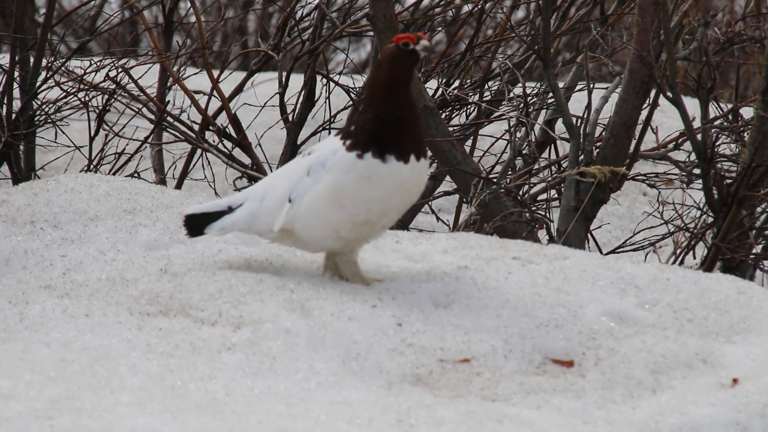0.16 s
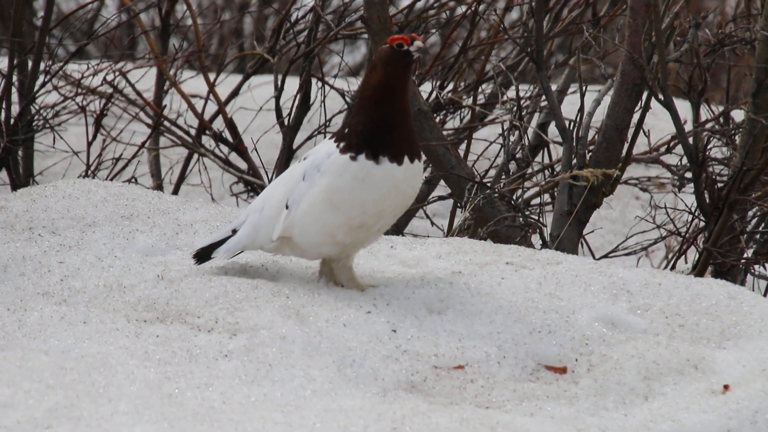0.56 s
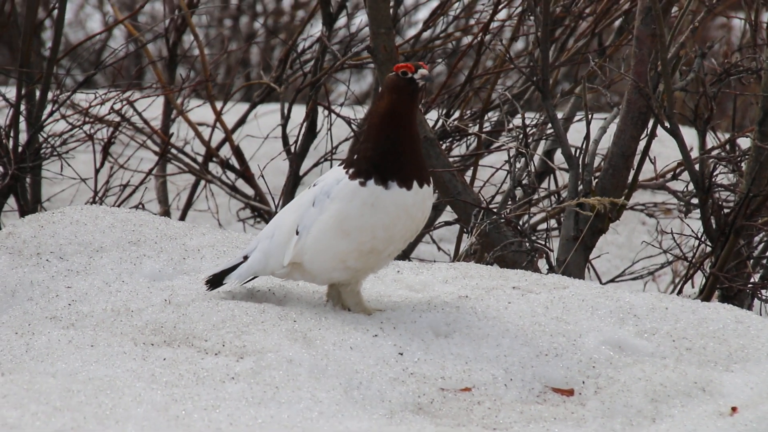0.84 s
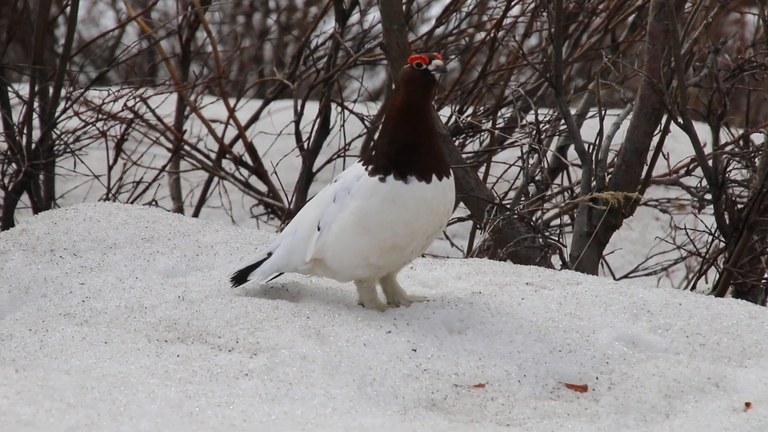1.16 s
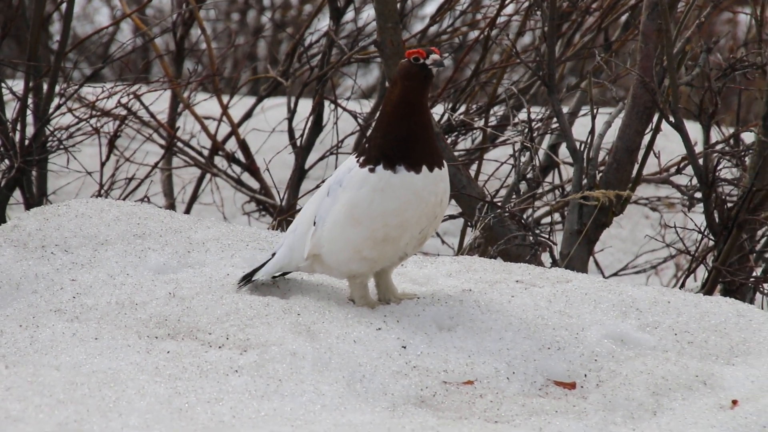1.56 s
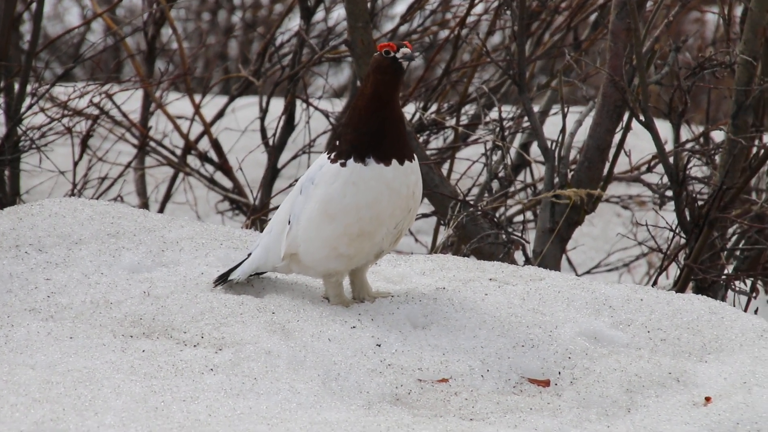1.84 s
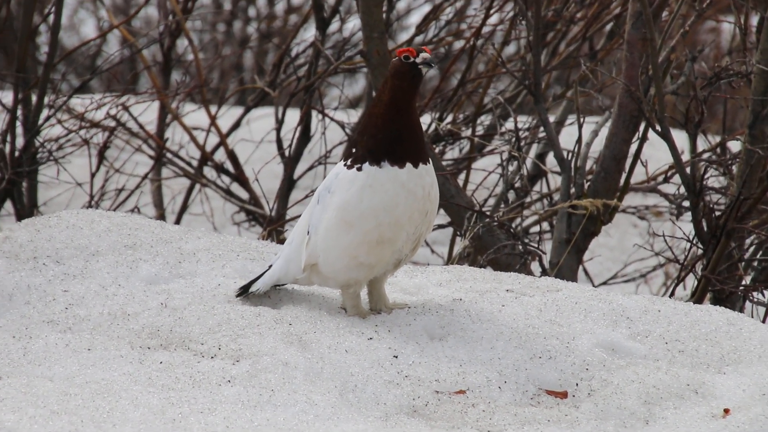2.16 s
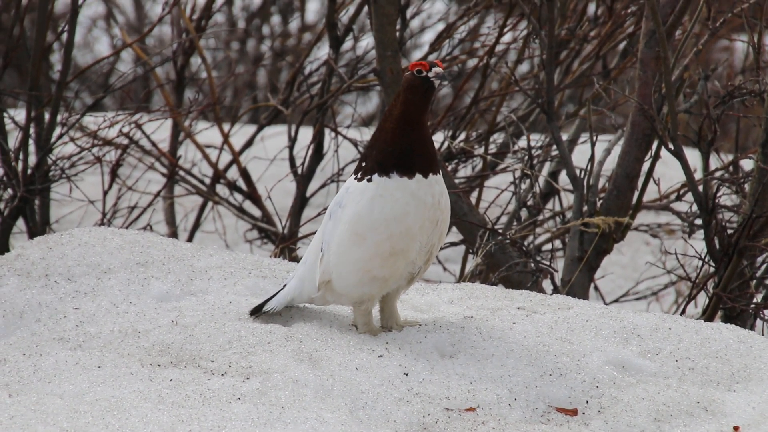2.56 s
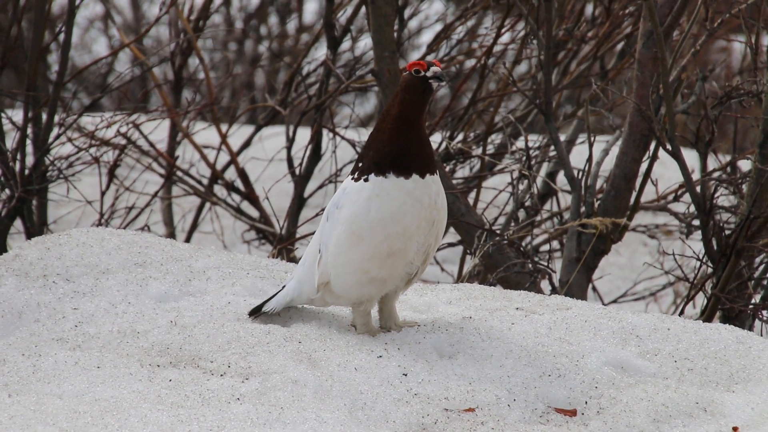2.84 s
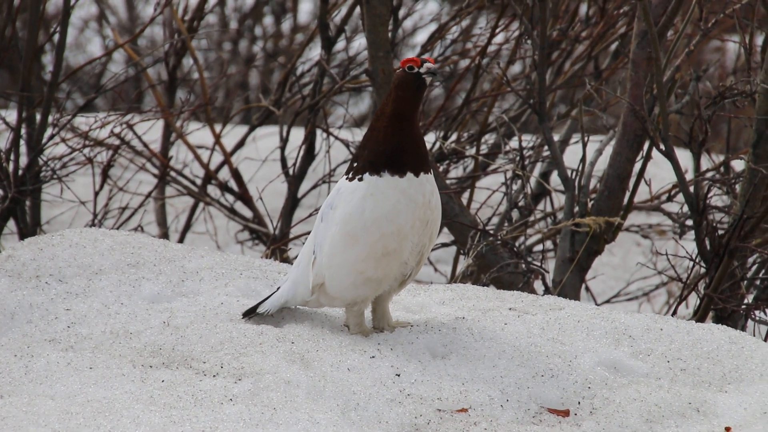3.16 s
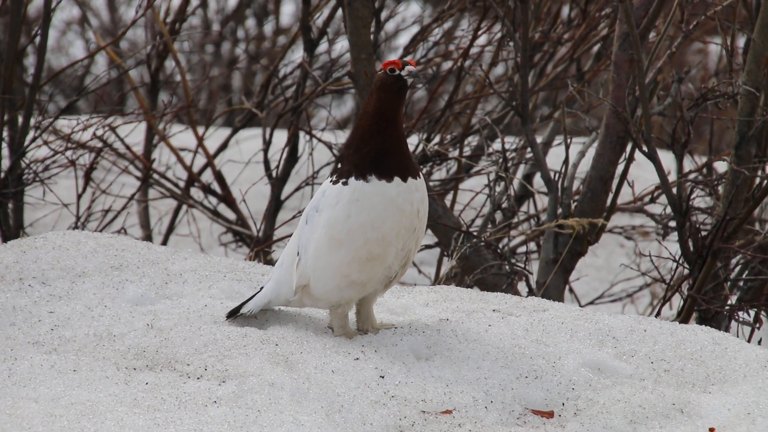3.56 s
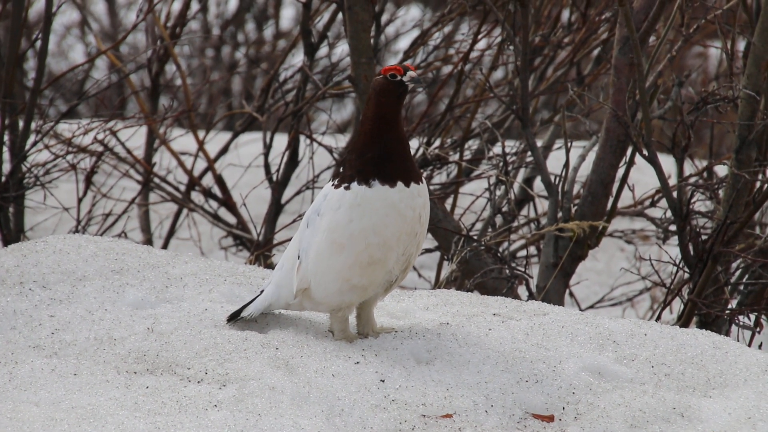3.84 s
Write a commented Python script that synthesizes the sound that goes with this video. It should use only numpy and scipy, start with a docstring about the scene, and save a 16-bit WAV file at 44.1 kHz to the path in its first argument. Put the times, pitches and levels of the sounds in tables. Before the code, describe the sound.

A ptarmigan gives short, pulsed throaty croaks, faint from 0.8 s, stronger by 1.3 s, quickening into a brighter open rattle around 2.5-3 s and ending softly at 3.3 s. Low wind buffets the stereo microphone, mostly in the first 2 s. Six dry camera-like double clicks at 0.26-0.65 s start with clatter and motor whirr; four more follow at 1.46-1.77 s. A faint thin chirp at 0.9 s; faint air hiss.

```python
"""Wind rumbles on two microphone ports throughout, over faint air hiss; most buffets fall in the first 2 s.
From 0.26 s: six dry double clicks, probably a camera lens; the first breaks into a clatter and a motor whirr.
From 0.77 s: a ptarmigan croaks, speeding up into a rattle as throat and bill open; it ends softly at 3.3 s.
Each croak is a few pulses ringing sweeping throat resonances; bushes scatter the bird sounds.
At 0.87 s: a small bird's thin chirp. At 1.46-1.77 s: four more double clicks between and beside early croaks."""
import sys
import numpy as np
from scipy import signal
from scipy.fft import rfft, irfft
from scipy.io import wavfile
from scipy.ndimage import uniform_filter1d

SR = 44100
rng = np.random.default_rng(int(sys.argv[2]) if len(sys.argv) > 2 else 0)


def dump(signal):
    """Clip the signal to [-1, 1] and save it as 16-bit WAV at the path in sys.argv[1]."""
    limited = np.clip(np.atleast_2d(signal).T, -1, 1)
    pcm = np.round(limited * 32767).astype(np.int16)
    wavfile.write(sys.argv[1], SR, pcm)


N = 176400

# croaks: start_s, level_db (before VOICE_DB), pulse_rate_hz, length_s, bill_opening (0-1), treble_db
CROAKS = [(0.7707, -46, 134.2, 0.032, 0, -15), (1.053, -39, 144.4, 0.025, 0, -14),
          (1.3039, -34, 144.6, .03, 0, -4), (1.531, -33.5, 145, 0.029, 0.03, 1.5),
          (1.696, -34, 146.3, 0.029, 0.05, 2.5), (1.832, -33, 146.6, .027, 0.15, -0.5),
          (1.9484, -32, 158.3, 0.029, 0.32, 0.5), (2.0586, -32, 161.6, 0.032, 0.35, 0),
          (2.1628, -32, 166.4, 0.034, .41, -1.5), (2.262, -31.5, 166.7, 0.035, 0.46, -1),
          (2.3581, -30.5, 174, 0.035, 0.47, 1.5), (2.449, -32, 169.2, 0.034, 0.6, -0.5),
          (2.5351, -31, 182, 0.031, 0.6, 0.5), (2.615, -31, 183.9, 0.032, 0.64, -1.5),
          (2.6918, -30, 189, 0.028, 0.72, 1), (2.7611, -29.5, 190.6, 0.026, 0.82, -1),
          (2.8224, -29.5, 188.1, 0.022, 0.89, -0.5), (2.8765, -29.5, 180, 0.024, 0.96, -1.5),
          (2.9285, -32.5, 171.2, 0.0217, .94, -1), (2.9782, -30.3, 180, .021, 0.99, -2.5),
          (3.0264, -36.5, 151.7, 0.013, 1, -14), (3.0692, -33, 167.5, 0.019, 0.95, -1),
          (3.117, -32, 165.6, .0165, 0.96, -2), (3.1655, -35.5, 152.6, .015, .92, -7),
          (3.2145, -34, 166, 0.016, 0.94, -6), (3.267, -34.5, 150.1, .019, 0.85, -6),
          (3.3306, -53.5, 122.3, 0.0092, 0, -2)]
# throat resonances, bill shut to wide: 4 x centre_hz, 4 x level_db, width_hz
THROAT = [(858.6, 845, 835, 795, 4.5, 4, 1, -2, 72), (1276, 1640, 1900, 2130, -2.5, -3, -2, 0.5, 93),
          (2740, 2660, 2490, 2430, -24, -7.5, 0.5, 0, 85),
          (3290, 4200, 5000, 5500, -15, -24.5, -21.5, -14.5, 86),
          (4070, 4500, 4350, 4190, -22, -10, -16.5, -14.5, 116),
          (5800, 6700, 7800, 9800, -52, -17, -12.5, -34, 210)]
# sign of each throat resonance
POLARITY = [1, -1, 1, 1, 1, -1]
# pulse strength through a croak: share_of_length, level_db
EFFORT = [(0, -4), (.22, -1), (.4, 0), (.6, -4.5), (.8, -8.5), (1, -17.5)]
# bill swing about its mean opening: share_of_length, swing (scaled down towards shut or wide)
BILL_SWING = [(0, -0.669), (.25, -0.147), (.48, 0.168), (.72, .44), (1.2, 0.24)]
# snap strength through a croak: share_of_length, level_db (before SNAP_DB)
SNAP_EFFORT = [(0, -13), (.19, 6), (.38, -5.5), (.56, -8), (1, -34)]
# snap colour: freq_hz, level_db
SNAP_COLOUR = [(3500, -30), (6300, -22), (8200, 2.5), (10500, 0.5), (12500, -9), (16000, -13)]
# lens clicks: start_s, level_db (before CLICK_DB), second_contact_delay_s, second_contact_db (relative)
CLICKS = [(0.2629, -24, 0.0091, -4), (0.3256, -23.5, 0.006, -6), (0.4063, -25.5, 0.0073, 1),
          (0.486, -24, .0042, -8), (.5670, -27, .0032, -2.5), (0.6449, -27.5, 0.0042, -1),
          (1.4613, -25.5, .0046, -1), (1.6058, -27, .0046, -1.5), (1.6874, -24.5, .0046, -12),
          (1.7656, -25.5, .0042, -5)]
# resonances of a click: freq_hz, level_db, t60_s
CLICK_MODES = [(753, -9.5, 0.047), (1100, -12, .03), (1360, -16, 0.043), (1674, -9, 0.014),
               (1783, -7, 0.023), (2506, 1.5, 0.0082), (2557, -7.5, 0.019), (2920, -13, 0.017),
               (3254, -5.5, 0.014), (3570, -10.5, 0.017), (4220, -25.5, 0.03), (4450, -19, 0.02),
               (5100, -35, 0.0087)]
# noisy body of a click: freq_hz, level_db
CLICK_BODY_COLOUR = [(200, -32), (700, -1), (1700, -3), (3600, 2), (5000, -13.5), (6500, -29), (15000, -38)]
# clatter contacts: start_s, ring_db, crack_db, splash_db
CLACKS = [(0.2638, -39, -28.5, -41), (0.2675, -48, -41, -41), (.2724, -32, -33, -43),
          (0.2765, -23, -40, -37.5), (0.2817, -28, -32, -58)]
# resonances of the clatter: freq_hz, level_db, t60_s
CLACK_MODES = [(716, -16, 0.027), (883, -7, 0.038), (980, -3, 0.034), (1170, 1.5, 0.042), (1540, -11, .027),
               (1700, -2, 0.019)]
# crack colour: freq_hz, level_db
CRACK_COLOUR = [(900, -9), (2000, -11), (3000, 2.5), (3600, 2), (4300, -17), (5500, -25), (9000, -45)]
# splash colour: freq_hz, level_db
SPLASH_COLOUR = [(3000, -18), (5000, 6), (6000, -14), (7000, 0), (8200, -10), (9400, 2), (11200, -13),
                 (13000, -6), (16000, -11)]
# lens motor whirr: time_s, level_db
WHIRR_LEVEL = [(.27, -66), (.285, -29), (.31, -41.5), (.38, -47), (.5, -52), (.68, -55), (.75, -87)]
# whirr colour: freq_hz, level_db
WHIRR_COLOUR = [(300, -31), (750, -2.5), (1150, -3), (1500, -19), (3000, -28), (8000, -43)]
# small bird whistle: time_s, pitch_hz, level_db
CHIRP = [(.872, 8200, -83), (.884, 7870, -56), (.897, 6870, -50.5), (0.911, 6530, -57), (.923, 6200, -58),
         (.942, 6350, -71)]
# wind between buffets: time_s, left_db, right_db (before WIND_DB)
WIND_LEVEL = [(0, -25, -41.5), (.12, -52, -52), (.3, -34, -38.5), (.45, -24.5, -22.5), (.65, -33, -21.5),
              (.9, -25, -34), (1.05, -37.5, -37.5), (1.35, -34.5, -36.5), (1.5, -29, -25),
              (1.783, -36.5, -42), (1.95, -33.5, -42), (2.2, -46.5, -52), (2.4, -46, -60), (2.6, -75, -69),
              (2.9, -54, -67), (3.15, -43.5, -58), (3.5, -51.5, -58), (4, -57, -62)]
# buffets on the left port: centre_s, level_db (before BUFFET_DB), length_s
BUFFETS_LEFT = [(0.233, -23.5, 0.018), (0.414, -8, 0.022), (0.565, -14.5, 0.034), (0.612, -9.5, 0.026),
                (0.788, -16.5, 0.025), (0.896, -12.5, 0.016), (1.009, -21, 0.013), (1.164, -9.5, 0.022),
                (1.193, -19, 0.015), (1.241, -16.5, 0.022), (1.344, -24.5, 0.015), (1.402, -15, 0.019),
                (1.428, -23, 0.022), (1.65, -20, 0.03), (1.833, -25, 0.015), (1.894, -20.5, 0.023),
                (1.938, -18.5, 0.066), (2.132, -33, 0.1), (2.315, -34, 0.015), (2.997, -37.5, 0.0107),
                (3.045, -34, 0.025), (3.282, -27.5, 0.052), (3.588, -37, 0.014), (3.644, -34, 0.0099),
                (3.713, -32.5, 0.031)]
# buffets on the right port: centre_s, level_db (before BUFFET_DB), length_s
BUFFETS_RIGHT = [(0.284, -26.5, 0.036), (0.451, -16, 0.0077), (0.547, -23.5, 0.16), (0.594, -18, 0.026),
                 (0.645, -11.5, 0.013), (0.706, -17.5, 0.016), (0.831, -24, 0.038), (0.952, -28, 0.061),
                 (1.102, -19.5, 0.009), (1.248, -21.5, 0.038), (1.353, -23, 0.024), (1.426, -21, 0.055),
                 (1.514, -22, 0.02), (1.667, -27.5, 0.02), (1.753, -26.5, 0.022), (2.004, -29.5, 0.032),
                 (2.161, -36, 0.14), (2.219, -32.5, 0.025), (2.327, -36, 0.049), (3.568, -38, 0.026)]
# colour of light wind: freq_hz, level_db
RUMBLE_COLOUR = [(15, -52), (35, -9.5), (80, 3), (130, -0.5), (200, -11.5), (300, -30), (500, -40),
                 (1500, -93)]
# colour of the extra eddies in hard gusts: freq_hz, level_db
EDDY_COLOUR = [(30, -43), (70, -17), (150, 1), (240, 7.5), (400, -11.5), (600, -28), (1000, -35),
               (2000, -60), (5000, -99)]
# sharp swirls across the left port: centre_s, level_db, length_s
SWIRLS = [(0.402, -22, 0.0065), (.481, -21, .008), (0.554, -18.5, 0.023), (0.566, -11, 0.0065),
          (0.581, -13.5, 0.0038), (0.612, -14.5, 0.012), (.893, -19.5, 0.0062), (1.121, -24, 0.016),
          (1.149, -21.5, 0.02), (1.932, -27.5, 0.026)]
# swirl colour: freq_hz, level_db
SWIRL_COLOUR = [(100, -31), (230, 8), (320, 11.5), (420, 2), (520, 1), (750, -11), (1100, -19.5),
                (2200, -63), (5000, -80)]
# outdoor air hiss: freq_hz, level_db
AIR_COLOUR = [(120, -50), (200, -22), (249, 0), (339, -1.5), (430, -3.5), (515, -3.5), (812, -2.5),
              (1300, -11), (3180, -15.5), (8660, -20.5), (15500, -26)]

VOICE_DB, VOICE_PAN_DB, PORT_LAG_S = 1.5, -.5, 2.6e-5  # pan: left minus right; lag: left port later
PITCH_ARCH, ARCH_PEAK_SHARE = .045, .55  # pulse period is shortest at the peak share
PULSE_JITTER, PULSE_SCATTER_DB = .012, 1.95
LEAD_IN_DB, LEAD_TREBLE_DB, ONSET_TREBLE_DB = -17, -18.5, -1  # faint lead-in pulse; first full pulse
SOFT_TREBLE_DB_PER_DB, LOW_FADE_DB = 0.3, -3.5  # weak pulses are dull; the lowest resonance fades
LOW_SAG_HZ, LOW_SAG_FROM_SHARE = 96, 0.51  # the lowest resonance sinks late in a croak
BREATH_DB, BREATH_S = -18, 0.0045
CHEST_HZ, CHEST_WIDTH_HZ, CHEST_DB, CHEST_DB_PER_EFFORT_DB = 367, 51, -26, 0.31
SNAP_DB, SNAP_S = -21, 0.0022
HOLLOW_HZ, HOLLOW_Q = 558, 3.7  # dip between chest and throat
CLICK_DB, CLICK_TICK_DB, CLICK_SCRAPE_S = 2, -33, 0.0014
CLICK_PORT_SPREAD_CYCLES = 0.165  # the camera body gives each port its own phases
FIRST_TILT_DB_PER_OCT, SECOND_TILT_DB_PER_OCT, TILT_HZ = 0, -0.5, 2600
CRACK_S = 0.00064
BODY_DB, BODY_T60_S, BODY_ATTACK_S = -9.5, 0.059, .0015
WHIRR_HZ = 126
CHIRP_OCTAVE_DB = -10
WIND_DB, BUFFET_DB, EDDY_DB = 3, 1.5, -4
RUMBLE_GROWTH, EDDY_GROWTH = 0.99, 2.52  # exponents on gust strength
GUST_REF_DB, GUST_CEILING_DB, STEADY_S = -16.5, -14, 0.015
AIR_DB, AIR_SHARED = -55.5, 0.23  # share of power common to both ports
TWIG_DB, TWIG_T60_S = -14, 0.053
THICKET_DB, THICKET_T60_S, THICKET_DELAY_S, THICKET_HZ = -19, 0.54, 0.0018, 1600
LOW_CUT_HZ, TOP_HZ = 24, 15850


def undb(db):
    """Decibels to gain."""
    return 10 ** (np.asarray(db) / 20)


def unit(x):
    """Scale to rms 1."""
    return x / np.sqrt(np.mean(x ** 2) + 1e-20)


def add(out, start_s, x):
    """Mix x into out at start_s."""
    i = max(int(round(start_s * SR)), 0)
    out[..., i:i + x.shape[-1]] += x[..., :N - i]


def noise(colour, size=N):
    """Noise of rms 1, its spectrum interpolated over log frequency."""
    hz, db = np.array(colour, float).T
    f = np.maximum(np.arange(size // 2 + 1) * SR / size, 1)
    gain = undb(np.interp(np.log(f), np.log(hz), db))
    return unit(irfft(rfft(rng.standard_normal(size)) * gain, size))


def croak(rate_hz, length_s, opening, treble_db, size=3000):
    """Pulses ring throat resonances that sweep with the bill, plus breath, chest ring and snap."""
    t = np.arange(size) / SR
    throat, openings = np.array(THROAT, float), np.linspace(0, 1, 4)
    progress = (t - 1 / rate_hz) / length_s  # 0 at the first full pulse
    swing = np.sqrt(np.clip(opening * (1 - opening), 0, 1))
    bill = np.clip(opening + swing * np.interp(progress, *np.array(BILL_SWING).T), 0, 1)
    hz = np.array([np.interp(bill, openings, row[:4]) for row in throat])
    hz[0] -= LOW_SAG_HZ * np.clip(2 * (progress - LOW_SAG_FROM_SHARE), 0, 1)
    turn = 2 * np.pi * np.cumsum(hz, axis=1) / SR
    high = np.clip(np.log2(hz[:, 0] / 2000), 0, 1)  # how far treble settings apply

    # breath: narrow noise riding on each resonance
    flutter = uniform_filter1d(rng.standard_normal((2,) + hz.shape), size=40)
    flutter = unit(uniform_filter1d(flutter, size=40))
    breath = undb(BREATH_DB) * (flutter[0] * np.sin(turn) + flutter[1] * np.cos(turn))
    snap = undb(SNAP_DB + treble_db) * np.sqrt(bill) * noise(SNAP_COLOUR, size=size)

    chance = rng.standard_normal((10, 2))
    out, at_s = np.zeros(size), 0
    for k in range(min(int(length_s * rate_hz) + 2, 10)):  # pulse 0 is the lead-in
        i = min(int(at_s * SR), size - 1)
        share = max(k - 1, 0) / rate_hz / length_s
        stretch = 0
        if k:
            arch = abs(share / ARCH_PEAK_SHARE - 1) * 2 - 1
            stretch = PITCH_ARCH * arch + PULSE_JITTER * chance[k, 0]
        at_s += (1 + stretch) / rate_hz
        effort_db = np.interp(share, *np.array(EFFORT).T) if k else LEAD_IN_DB

        db = np.array([np.interp(bill[i], openings, row[4:8]) for row in throat])
        db += high * (treble_db + SOFT_TREBLE_DB_PER_DB * effort_db)
        db[2:] += LEAD_TREBLE_DB * (k == 0) + ONSET_TREBLE_DB * (k == 1)
        db[0] += LOW_FADE_DB * share

        age = t[:size - i]
        phase = turn[:, i:] - turn[:, i:i + 1]
        rings = np.exp(-np.pi * throat[:, 8:] * age) * np.sin(phase)
        rings = rings + breath[:, i:] * np.exp(-age / BREATH_S)
        pulse_gain = undb(effort_db + PULSE_SCATTER_DB * chance[k, 1])
        out[i:] += pulse_gain * ((POLARITY * undb(db)) @ rings)
        if k:
            chest = np.exp(-np.pi * CHEST_WIDTH_HZ * age) * np.sin(2 * np.pi * CHEST_HZ * age)
            out[i:] += undb(CHEST_DB + CHEST_DB_PER_EFFORT_DB * effort_db) * chest
            snap_gain = undb(np.interp(share, *np.array(SNAP_EFFORT).T))
            out[i:] += snap_gain * snap[i:] * np.exp(-age / SNAP_S)
    return out / np.sqrt(np.sum(out ** 2) / (.026 * SR))  # equal energy for every croak


def ptarmigan():
    """The run of croaks; each begins one pulse early with a faint lead-in."""
    out = np.zeros(N)
    for start_s, db, rate_hz, length_s, opening, treble_db in CROAKS:
        call = croak(rate_hz, length_s, opening, treble_db)
        add(out, start_s - 1 / rate_hz, undb(db + VOICE_DB) * call)
    return signal.lfilter(*signal.iirnotch(HOLLOW_HZ, HOLLOW_Q, fs=SR), out)


def contact(modes, tilt_db_per_oct, size=9000):
    """A scraping contact rings small modes at both ports, scaled to peak 1, under a noise tick."""
    t = np.arange(size) / SR
    ring = np.zeros((2, size))
    for hz, db, t60_s in modes:
        cycles = rng.random() + CLICK_PORT_SPREAD_CYCLES * rng.standard_normal((2, 1))
        decay = undb(db + tilt_db_per_oct * np.log2(hz / TILT_HZ) - 60 * t / t60_s)
        ring += decay * np.sin(2 * np.pi * (hz * t + cycles))
    ring *= 1 - np.exp(-2 * t / CLICK_SCRAPE_S)
    tick = rng.standard_normal((2, size)) * np.exp(-t / CLICK_SCRAPE_S)
    return ring / np.abs(ring).max() + undb(CLICK_TICK_DB) * tick


def lens():
    """Double clicks: two contacts of a small mechanism, milliseconds apart."""
    out = np.zeros((2, N))
    for start_s, db, delay_s, second_db in CLICKS:
        first_gain = undb(db + CLICK_DB)
        add(out, start_s, first_gain * contact(CLICK_MODES, FIRST_TILT_DB_PER_OCT))
        second = contact(CLICK_MODES, SECOND_TILT_DB_PER_OCT)
        add(out, start_s + delay_s, first_gain * undb(second_db) * second)
    return out


def clatter(size=1000):
    """Hard contacts in quick succession: each a dense crack, a bright splash and a low ring."""
    out, age = np.zeros((2, N)), np.arange(size) / SR / CRACK_S
    burst = age * np.exp(1 - age)
    for start_s, ring_db, crack_db, splash_db in CLACKS:
        add(out, start_s, undb(ring_db) * contact(CLACK_MODES, 0))
        add(out, start_s, burst * undb(crack_db) * noise(CRACK_COLOUR, size=size))
        splash = np.array([noise(SPLASH_COLOUR, size=size) for _ in range(2)])
        add(out, start_s, burst * undb(splash_db) * splash)
    return out


def click_body():
    """A decaying noise tail after each click, independent at the two ports."""
    t = np.arange(N) / SR
    tail = np.zeros(N)
    for at_s, db, _, _ in CLICKS:
        age = t - at_s
        fall_db = 60 * np.clip(age, 0, 4 * BODY_T60_S) / BODY_T60_S
        tail += undb(db + BODY_DB - fall_db) * np.clip(age / BODY_ATTACK_S, 0, 1)
    return tail * np.array([noise(CLICK_BODY_COLOUR) for _ in range(2)])


def motor_whirr():
    """Noise pulsing at the motor's rate, independent at the two ports."""
    t = np.arange(N) / SR
    pulsing = (1 + np.cos(2 * np.pi * WHIRR_HZ * t)) * 0.44
    level = undb(np.interp(t, *np.array(WHIRR_LEVEL).T))
    return level * pulsing * np.array([noise(WHIRR_COLOUR) for _ in range(2)])


def small_bird():
    """One thin falling whistle with slight pitch wobble and a weaker octave."""
    t = np.arange(N) / SR
    at_s, hz, db = np.array(CHIRP).T
    wobble = 1 + 0.0096 * noise([(300, 2), (900, -42)])
    turn = 2 * np.pi * np.cumsum(np.interp(t, at_s, hz) * wobble) / SR
    level = undb(np.interp(t, at_s, db)) * (t > at_s[0]) * (t < at_s[-1])
    return level * (np.sin(turn) + undb(CHIRP_OCTAVE_DB) * np.sin(2 * turn))


def ports(x):
    """A sound from ahead reaches the two ports with slightly different delay and level."""
    half = np.array([[.5], [-.5]])
    hz = np.arange(N // 2 + 1) * SR / N
    delay = np.exp(-2j * np.pi * hz * half * PORT_LAG_S)
    return irfft(rfft(x) * delay, N) * undb(half * VOICE_PAN_DB)


def thicket(x, size=22000):
    """Quick scatter from near twigs and a weak tail from the bushes; both spare the lows."""
    t = np.arange(size) / SR
    x = signal.sosfilt(signal.butter(1, THICKET_HZ, "high", fs=SR, output="sos"), x)
    out = np.zeros((2, N))
    for db, t60_s in (TWIG_DB, TWIG_T60_S), (THICKET_DB, THICKET_T60_S):
        fade = undb(-60 * t / t60_s) * np.clip(t / THICKET_DELAY_S, 0, 1)
        tail = rng.standard_normal((2, size)) * fade
        out += undb(db) * np.array([signal.fftconvolve(x, h / np.linalg.norm(h))[:N] for h in tail])
    return out


def turbulence(colour):
    """Coloured noise with its chance swells evened out, so that the gusts set the level."""
    x = noise(colour)
    span = max(int(STEADY_S * SR), 2)
    power = uniform_filter1d(uniform_filter1d(x ** 2, span), span)
    return x / np.sqrt(power + 1e-9)


def wind(buffets, channel):
    """Rumble on one port; buffets swell it and hard gusts add higher eddies."""
    t = np.arange(N) / SR
    curve = np.array(WIND_LEVEL)
    power = undb(np.interp(t, curve[:, 0], curve[:, 1 + channel]) + WIND_DB) ** 2
    for at_s, db, length_s in buffets:
        bump = np.exp(-np.minimum((2 * (t - at_s) / length_s) ** 2 * 2, 100))
        power += undb(db + BUFFET_DB) ** 2 * bump
    ref, ceiling = undb(GUST_REF_DB), undb(GUST_CEILING_DB)
    gust = ceiling * np.tanh(np.sqrt(power) / ceiling)  # soft limit
    rumble = ref * (gust / ref) ** RUMBLE_GROWTH * turbulence(RUMBLE_COLOUR)
    eddies = ref * (gust / ref) ** EDDY_GROWTH * turbulence(EDDY_COLOUR)
    return rumble + undb(EDDY_DB) * eddies


def swirls():
    """Brief, brighter bursts of wind on the left port."""
    t = np.arange(N) / SR
    level = np.zeros(N)
    for at_s, db, length_s in SWIRLS:
        level += undb(db) * np.exp(-np.minimum((2 * (t - at_s) / length_s) ** 2, 100))
    return level * turbulence(SWIRL_COLOUR)


def air():
    """Faint steady outdoor hiss, partly shared by both ports."""
    separate = np.array([noise(AIR_COLOUR), noise(AIR_COLOUR)])
    hiss = np.sqrt(AIR_SHARED) * noise(AIR_COLOUR) + np.sqrt(1 - AIR_SHARED) * separate
    return undb(AIR_DB) * hiss


def scene():
    """Birds ahead, clicks in the camera, wind on both ports."""
    birds = ptarmigan() + small_bird()
    camera = lens() + clatter() + click_body() + motor_whirr()
    gusts = np.array([wind(BUFFETS_LEFT, 0) + swirls(), wind(BUFFETS_RIGHT, 1)])
    return ports(birds) + thicket(birds) + camera + gusts + air()


def record(dry):
    """The recorder thins the deepest bass and cuts the top."""
    dry = signal.sosfilt(signal.butter(2, LOW_CUT_HZ, "high", fs=SR, output="sos"), dry)
    return signal.sosfilt(signal.ellip(10, .2, 80, TOP_HZ, fs=SR, output="sos"), dry)


dry = scene()
out = record(dry)
dump(out)
```